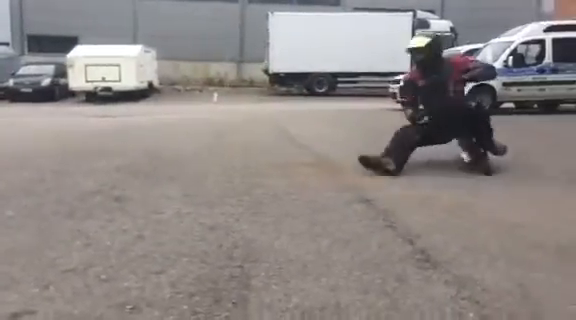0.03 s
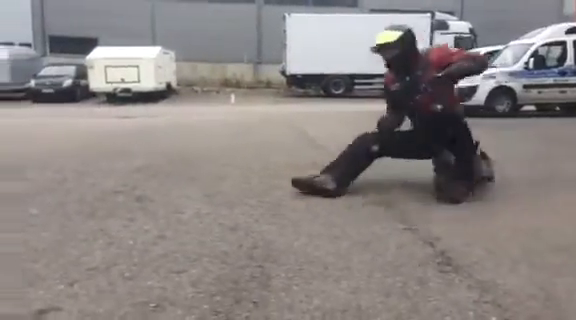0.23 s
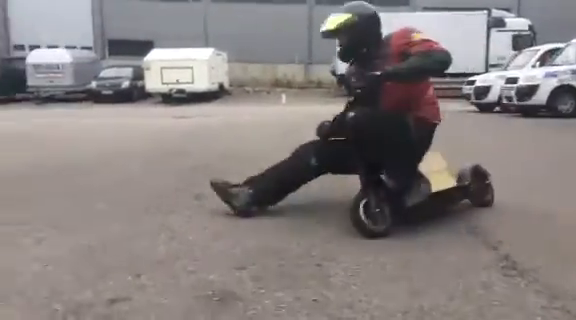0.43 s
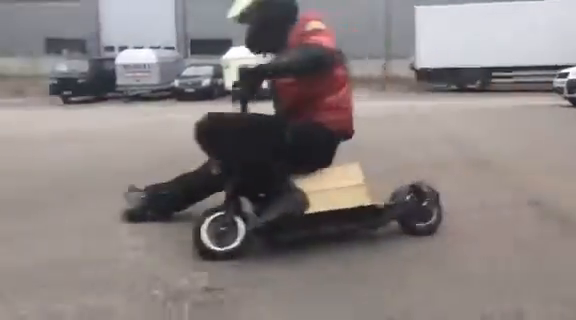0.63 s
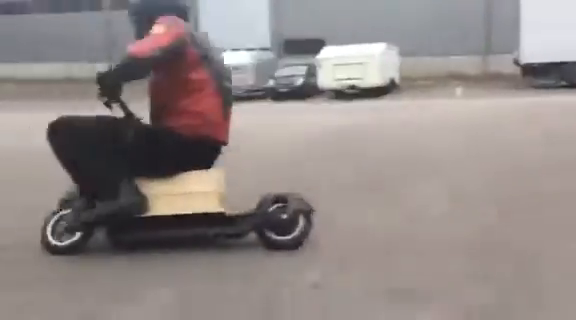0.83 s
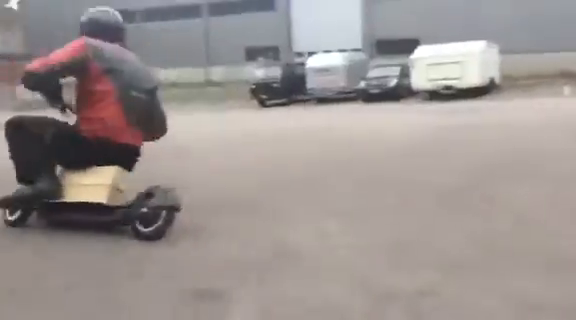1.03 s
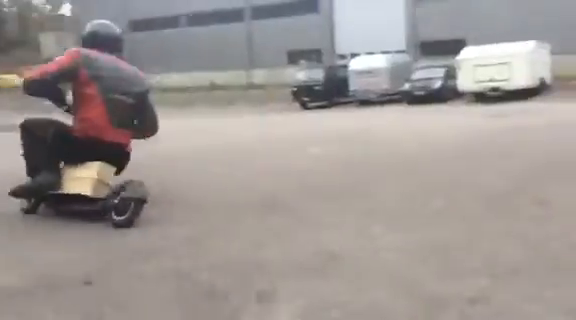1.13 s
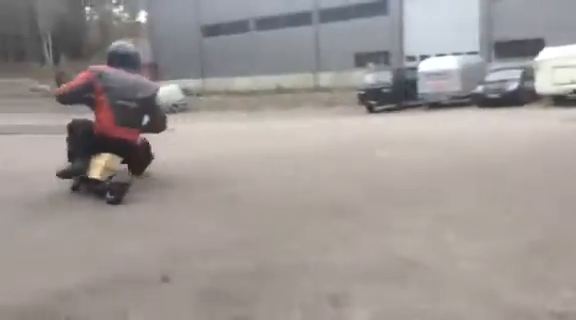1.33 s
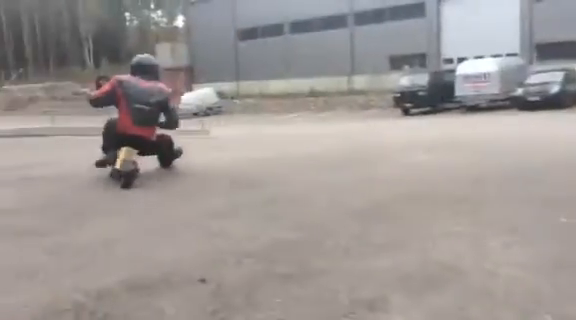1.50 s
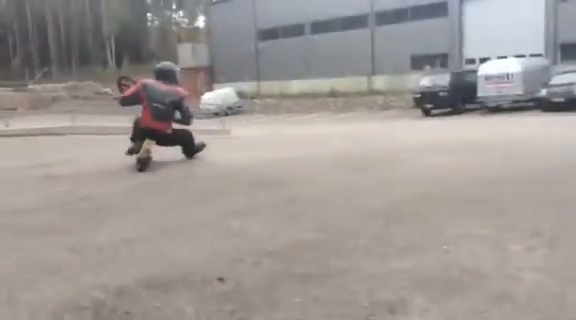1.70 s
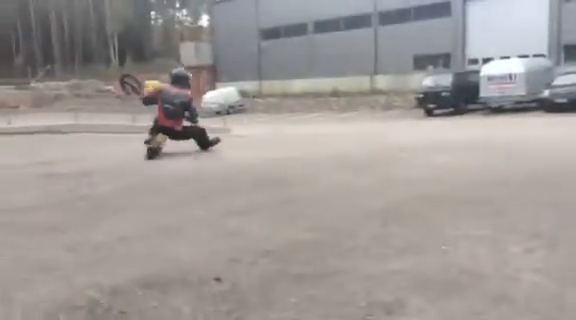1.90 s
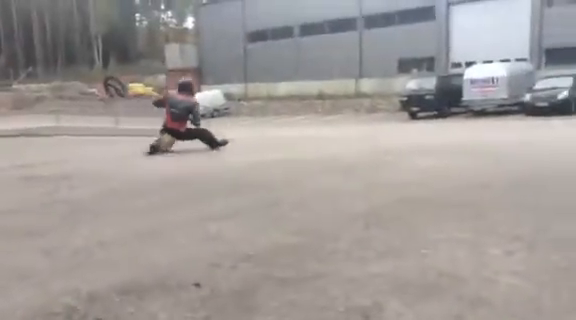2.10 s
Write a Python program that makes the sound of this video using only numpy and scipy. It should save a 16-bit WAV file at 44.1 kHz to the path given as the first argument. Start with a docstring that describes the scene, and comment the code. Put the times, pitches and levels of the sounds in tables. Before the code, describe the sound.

Cloth rubs directly on the microphone, with dry scraping, sharp snaps and dull bumps from about 0.2 to 0.5 seconds, then in two more strokes between 0.8 and 1.3 seconds. Beneath it, a small electric scooter passes with a wavering motor whine and tyres rushing on gritty asphalt, strongest around 1 second. It then recedes into faint open yard background, with a few lighter cloth clicks near 1.6 seconds.

```python
"""A small electric scooter swings past over rough asphalt: its hub motor whines, its tyres rush on grit.
The place is an open yard with faint wall echoes and a steady background, heard in mono from the camera
that follows the scooter. Right at the microphone, a hand and sleeve rub on the camera:
dry scraping strokes, sharp snaps where the cloth catches, and dull bumps of the case."""
import sys
import numpy as np
from scipy import signal
from scipy.fft import rfft, irfft, next_fast_len
from scipy.io import wavfile
from scipy.ndimage import map_coordinates

SR = 44100
rng = np.random.default_rng(int(sys.argv[2]) if len(sys.argv) > 2 else 0)


def to_wav(s):
    """Save 16-bit WAV."""
    ch = np.atleast_2d(s).T  # columns
    pcm = np.round(np.clip(ch, -1, 1) * 32767)  # PCM
    wavfile.write(sys.argv[1], SR, pcm.astype(np.int16))


N = 94815
TOP_HZ = 8950  # upper band limit of the camera's microphone


def scooter(waver=0.0026, flutter_db=0.8, dull_hz=2500, treble_db_per_db=0.093):
    """Out in the yard, the hub motor's wavering whine over tyres that crunch on grit, duller when far."""
    # motor whine: t/s, f/Hz, level/dB
    motor = [(0, 458, -49.5), (.1, 470, -47), (.17, 493, -53.5), (.33, 512.5, -40.5), (.57, 481, -61),
             (.69, 468, -45), (.8, 485, -58), (.89, 478, -37), (1.06, 470, -37.5), (1.18, 492, -42),
             (1.3, 470, -47.5), (1.42, 468, -53), (1.8, 470, -50), (2.02, 474, -50.5), (2.15, 487, -51)]
    # tyre rush at the microphone: t/s, level/dB
    tyre_levels = [(0, -49), (.2, -44.5), (.45, -35), (.62, -42), (.8, -34), (1.05, -37), (1.25, -38),
                   (1.4, -43), (1.6, -43.5), (1.9, -51), (2.15, -45.5)]
    # spectrum of tyres on asphalt: f/Hz, level/dB
    tyre_colour = [(30, -39.5), (60, -14.5), (130, -10.5), (230, -4), (380, -9.5), (520, 0), (700, -0.5),
                   (900, -3.5), (1250, -5.5), (1650, -7.5), (2200, -13.5), (4000, -18.5), (8500, -19.5)]
    hz, db = curves(motor)
    phase = 2 * np.pi * np.cumsum(hz * (1 + waver * wobble(57.5))) / SR
    whine = np.sqrt(2) * amp(db + flutter_db * wobble(30)) * np.sin(phase)
    tyre_db, = curves(tyre_levels)
    crunch = textured(grit(rate=900, spread_db=5, share=0.38), tyre_colour)
    crunch = patchy(crunch, depth_db=2.0, width_hz=164, life_s=0.043)
    body = signal.sosfiltfilt(signal.butter(1, dull_hz, fs=SR, output="sos"), crunch)
    treble = amp(treble_db_per_db * (tyre_db - tyre_db.mean())) * (crunch - body)
    return whine + amp(tyre_db + 0.9 * wobble(35.14)) * (body + treble)


def rubbing(firm_db=-26.5, hiss_exponent=0.56):
    """Cloth sticks and slips at the microphone: a grainy rasp, a finer hiss, a low rumble in the case."""
    # rasp of three strokes, one list each: t/s, level/dB
    strokes = [
        [(.215, -58), (.221, -46.5), (.265, -38.5), (.29, -25.5), (.335, -24.5), (.357, -28.5), (.385, -26.5),
         (.412, -38.5), (.465, -35), (.492, -29.5), (.512, -45), (.58, -54.5), (.66, -43.5)],
        [(.73, -45), (.765, -35), (.79, -37.5), (.82, -29), (.836, -26.5), (.848, -38), (.88, -38.5),
         (.92, -25.5), (.944, -33), (.96, -23.5), (1.003, -24.5), (1.018, -31.5), (1.055, -38.5)],
        [(1.055, -48), (1.08, -23.5), (1.093, -29), (1.12, -25), (1.148, -21.5), (1.183, -26.5), (1.198, -35),
         (1.24, -32), (1.27, -50.5), (1.3, -75)],
    ]
    # hiss under a stroke as firm as firm_db: t/s, level/dB
    hiss_levels = [(.22, -29.5), (.35, -30), (.49, -29), (.76, -68), (.83, -35), (.97, -38.5),
                   (1.16, -36.5), (1.24, -32.5)]
    # spectrum of the hiss: f/Hz, level/dB
    hiss_colour = [(1500, -14.5), (3500, -15), (6000, -8), (8500, -11.5)]
    # rumble of the rubbed case: t/s, level/dB
    rumble_levels = [(.215, -74), (.228, -32), (.31, -28.5), (.4, -31.5), (.5, -37.5), (.58, -42.5),
                     (.65, -51.5), (.79, -50), (.84, -37), (.9, -41), (.95, -51), (1, -39.5), (1.08, -48.5),
                     (1.15, -31.5), (1.24, -43), (1.4, -64.5)]
    # spectrum of the rumble: f/Hz, level/dB
    rumble_colour = [(40, -37.5), (75, -29), (110, -10.5), (155, -2.5), (205, 0.5), (255, 0.5),
                     (340, -12.5), (600, -27)]
    pressure = sum(amp(curves(stroke, outside=-120)[0]) for stroke in strokes) * amp(1.8 * wobble(170))
    rasp = coloured(grit(rate=1400, spread_db=3, share=0.49), cloth_db)
    rasp = contact_resonance(patchy(rasp, depth_db=4.0, width_hz=49, life_s=0.017))
    fine = textured(grit(rate=4000, spread_db=5, share=0.2), hiss_colour)
    fine = patchy(fine, depth_db=7, width_hz=160, life_s=0.018)
    # the hiss follows the pressure less than the rasp does
    hiss = amp(curves(hiss_levels)[0]) * (pressure / amp(firm_db)) ** hiss_exponent * fine
    rumble = amp(curves(rumble_levels)[0]) * textured(rng.standard_normal(N), rumble_colour)
    return pressure * rasp + hiss + rumble


def contact_resonance(rasp, lift_db=4.5, width_oct=0.53):
    """Lifts the rasp around a resonance that moves with the contact; returns rms 1."""
    # centre of the resonance: t/s, f/Hz
    centres = [(0.287, 1200), (.305, 2800), (.338, 3800), (0.386, 1840), (.45, 3480), (.497, 1190),
               (.77, 1900), (0.831, 4540), (.842, 1400), (.92, 3110), (.96, 1900), (1.005, 2630),
               (1.1, 2600), (1.14, 1600), (1.239, 1860)]
    hz, t, spectra = signal.stft(rasp, SR, nperseg=256)
    s, centre_hz = np.transpose(centres)
    octaves = np.log2(hz + 1)[:, None] - np.interp(t, s, np.log2(centre_hz))
    spectra = spectra * amp(lift_db * gaussian(octaves, width_oct))
    return unit(signal.istft(spectra, SR, nperseg=256)[1][:N])


def cloth_db(hz, low_hz=380):
    """Colour of the close cloth in dB, thin in the bass."""
    # spectrum of rubbing cloth: f/Hz, level/dB
    cloth_colour = [(400, -13.5), (520, -2), (700, -1.5), (880, -4.5), (1100, -2), (1700, -2), (2400, -3.5),
                    (3500, -6), (4700, -9.5), (6500, -12), (9000, -14.5)]
    return along(cloth_colour, hz) - 10 * np.log10(1 + (low_hz / (hz + 20)) ** 6) - top_loss_db(hz)


def snaps(scatter=0.36, focus_db=8.5, width_oct=0.33, pivot_hz=2000):
    """Each catch of the sleeve lets go with one click and a spray of smaller slips, in its own colour."""
    # cloth snaps: t/s, peak level/dB, centre f/Hz, t60/s
    catches = [(0.1174, -28, 4800, .014), (.163, -35, 3840, 0.013), (.296, -9, 3000, .022),
               (.379, -9.5, 2000, 0.018), (0.3855, -8, 1800, 0.015), (.477, -12.5, 5000, .015),
               (.492, -14.5, 1200, 0.058), (0.53, -26, 4000, .01), (0.654, -22, 7100, 0.0084),
               (.7635, -15.5, 1680, 0.014), (.7975, -16, 3030, .008), (0.8076, -14.5, 4500, .005),
               (.8138, -5.5, 5800, 0.012), (0.838, -13, 1390, 0.008), (.923, -10.5, 3340, 0.003),
               (.9555, -8.5, 1810, 0.013), (.959, -8, 2220, 0.018), (.986, -14, 1800, 0.0096),
               (1.003, -11.5, 2540, 0.0079), (1.079, -12, 1560, 0.0073), (1.0996, -10, 2700, 0.01),
               (1.1068, -8.5, 5500, .005), (1.128, -14, 1640, 0.011), (1.1612, -6, 1710, 0.028),
               (1.182, -13.5, 1700, 0.024), (1.211, -14, 5150, 0.039), (1.233, -15, 6000, 0.0069),
               (1.238, -18, 1860, 0.013), (1.319, -39, 1320, .03), (1.384, -35.5, 2800, 0.022),
               (1.575, -22, 1375, 0.011), (1.578, -21, 1620, 0.027), (1.588, -23, 2420, 0.034),
               (1.787, -32, 3000, 0.018), (1.957, -37, 4800, .01)]
    out, t = np.zeros(N), np.arange(SR // 16) / SR
    for s, db, centre_hz, t60 in catches:
        slips = scatter * rng.standard_normal(len(t)) * amp(-60 * t / t60) / 2
        slips[0] = -1  # the click
        tilt_db_per_oct = 2.5 * np.log2(centre_hz / pivot_hz)

        def snap_db(hz):
            octaves = np.log2((hz + 100) / centre_hz)
            return cloth_db(hz) + tilt_db_per_oct * octaves + focus_db * gaussian(octaves, width_oct)

        snap = coloured(slips, snap_db)
        add(out, s, amp(db) * snap / np.abs(snap).max())
    return out


def bumps(attack_s=0.0022, low_hz=95):
    """Soft knocks ring the low, damped modes of the camera's case, with no deep bass."""
    # knocks on the case: t/s, peak level/dB
    knocks = [(.221, -19), (.274, -22), (0.373, -30), (0.462, -24), (.547, -31), (0.834, -27), (1.142, -41),
              (1.204, -37), (1.324, -39.5)]
    # modes of the case: f/Hz, level/dB, t60/s
    case_modes = [(129.5, -0.5, 0.067), (161, 0, 0.11), (188.5, -6, 0.21), (259, -7, 0.09)]
    out, t = np.zeros(N), np.arange(SR // 5) / SR
    low_cut = signal.butter(4, low_hz, "high", fs=SR, output="sos")
    for s, db in knocks:
        ring = sum(amp(level + rng.normal(0, 0.79) - 60 * t / t60) * np.sin(2 * np.pi * hz * t)
                   for hz, level, t60 in case_modes)
        ring = signal.sosfilt(low_cut, ring * (1 - np.exp(-t / attack_s)))
        add(out, s, amp(db) * ring / np.abs(ring).max())
    return out


def wall_echo(direct, t60_s=0.75, level_db=-33):
    """The yard's walls send a faint, diffuse tail back to the microphone."""
    t = np.arange(SR // 2) / SR
    tail = rng.standard_normal(len(t)) * amp(-60 * t / t60_s)
    return amp(level_db) * signal.fftconvolve(direct, tail / np.linalg.norm(tail))[:N]


def yard_ambience(level_db=-52.5):
    """The steady, low background noise of the open yard."""
    # spectrum of the background: f/Hz, level/dB
    yard_colour = [(25, -19), (60, -13.5), (130, -12), (190, -3), (260, -11), (350, -13.5), (430, -3),
                   (540, -10), (850, -10), (1500, -13.5), (2500, -16), (4500, -39.5), (9000, -30)]
    return amp(level_db) * textured(rng.standard_normal(N), yard_colour)


def grit(rate, spread_db, share):
    """Tiny random contacts, rate a second, on a bed of noise; share is their part of the power."""
    ticks = (rng.random(N) < rate / SR) * rng.choice([-1, 1], N)
    ticks = ticks * amp(spread_db * np.minimum(rng.standard_normal(N), 2))
    return np.sqrt(share) * unit(ticks) + np.sqrt(1 - share) * rng.standard_normal(N)


def patchy(x, depth_db, width_hz, life_s):
    """Resonant patches come and go as the contact shifts; returns rms 1."""
    frame, hop = 512, 128
    spectra = signal.stft(x, nperseg=frame, noverlap=frame - hop)[2]
    field = rng.standard_normal(spectra.shape)
    for axis, width in enumerate([width_hz * frame / SR, life_s * SR / hop]):
        offsets = np.arange(spectra.shape[axis]) - spectra.shape[axis] // 2
        field = signal.fftconvolve(field, np.expand_dims(gaussian(offsets, width), 1 - axis), "same")
    spectra = spectra * amp(depth_db * unit(field))
    return unit(signal.istft(spectra, nperseg=frame, noverlap=frame - hop)[1][:N])


def coloured(x, level_db):
    """x through a causal filter whose level is a function of frequency."""
    m = 2 * next_fast_len(len(x))
    cepstrum = irfft(np.log(amp(level_db(np.fft.rfftfreq(m, 1 / SR)))), m)
    cepstrum[1:m // 2] *= 2  # folded for minimum phase
    cepstrum[m // 2 + 1:] = 0
    return irfft(rfft(x, m) * np.exp(rfft(cepstrum)), m)[:len(x)]


def textured(source, colour):
    """A source in the given colour, at rms 1."""
    return unit(coloured(source, lambda hz: along(colour, hz) - top_loss_db(hz)))


def top_loss_db(hz):
    """Treble lost around and above the microphone's band limit."""
    return 10 * np.log10(1 + (hz / TOP_HZ) ** 20)


def amp(db):
    """Decibels to gain."""
    return 10 ** (np.asarray(db) / 20)


def unit(x):
    """Scaled to rms 1."""
    return x / np.sqrt(np.mean(x ** 2) + 1e-20)


def gaussian(x, width):
    """A bell curve of height 1."""
    return np.exp(-.5 * (x / width) ** 2)


def along(points, hz):
    """Points of f/Hz, level/dB read on a log frequency axis."""
    f, db = np.transpose(points)
    return np.interp(np.log(hz + 1), np.log(f + 1), db)


def curves(rows, outside=None):
    """One value per sample for each column after the time."""
    s, *cols = np.transpose(rows)
    return [np.interp(np.arange(N) / SR, s, c, outside, outside) for c in cols]


def wobble(rate):
    """A smooth random curve, rate knots a second."""
    return map_coordinates(rng.standard_normal(int(N * rate / SR) + 4), [np.arange(N) * rate / SR])


def add(track, s, sound):
    """Mixes a sound in at time s."""
    part = track[max(round(s * SR), 0):][:len(sound)]
    part += sound[:len(part)]


def scene():
    """The passing scooter and the close handling noise, set in the yard, in mono."""
    direct = scooter() + rubbing() + snaps() + bumps()
    return (direct + wall_echo(direct) + yard_ambience())[None]


def record(dry):
    """The camera keeps nothing above its band limit."""
    m = next_fast_len(N + SR // 2)
    hz = np.fft.rfftfreq(m, 1 / SR)
    return irfft(rfft(dry, m) / np.sqrt(1 + (hz / TOP_HZ) ** 160), m)[..., :N]


dry = scene()
out = record(dry)
to_wav(out)
```